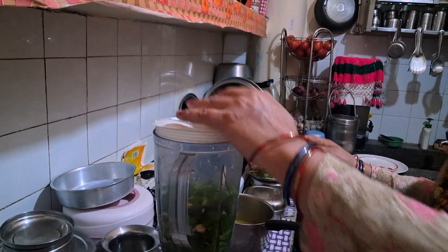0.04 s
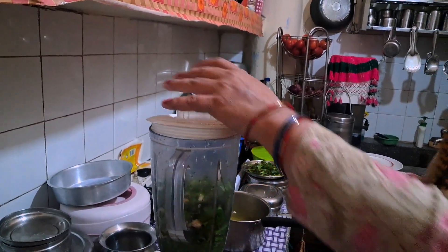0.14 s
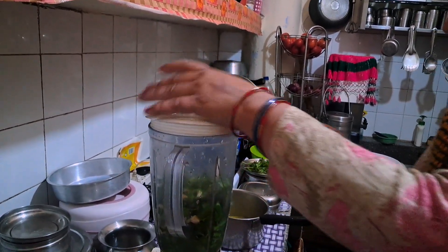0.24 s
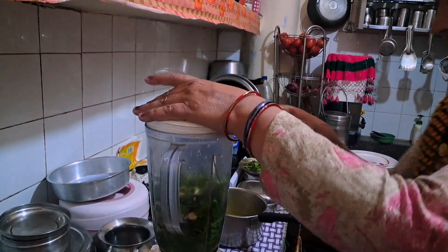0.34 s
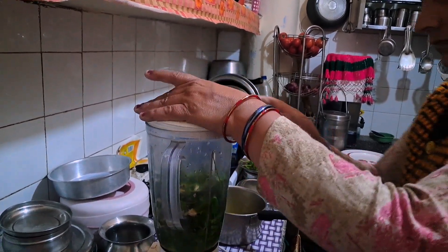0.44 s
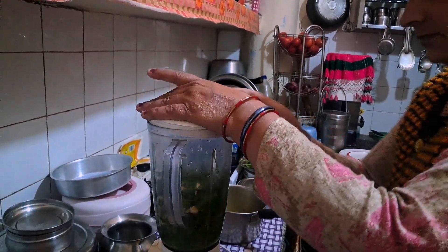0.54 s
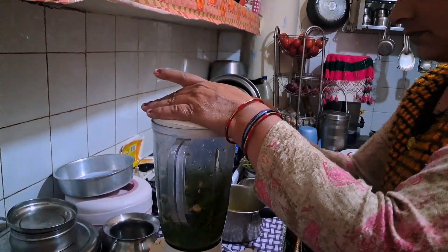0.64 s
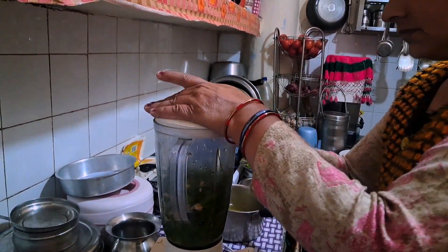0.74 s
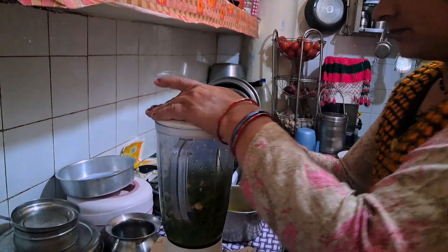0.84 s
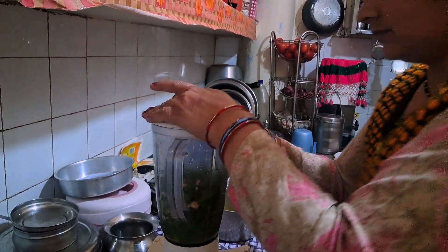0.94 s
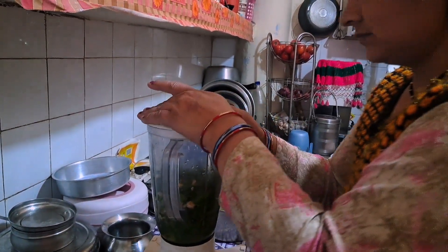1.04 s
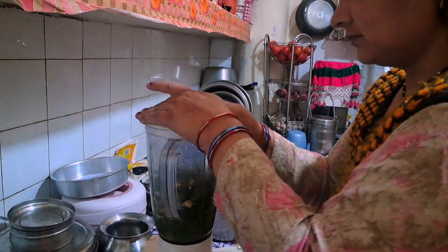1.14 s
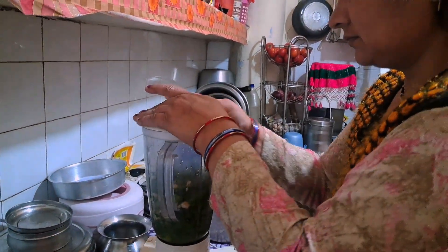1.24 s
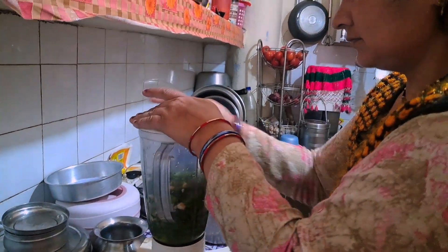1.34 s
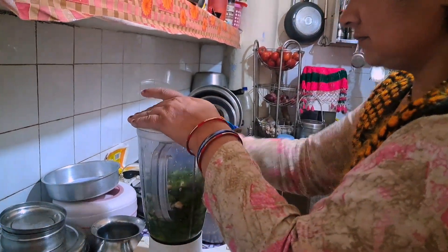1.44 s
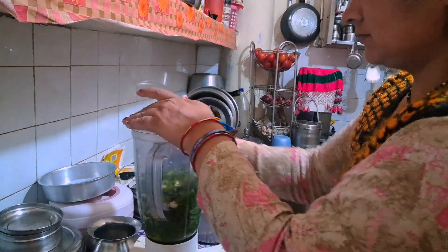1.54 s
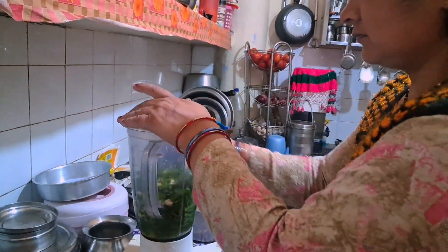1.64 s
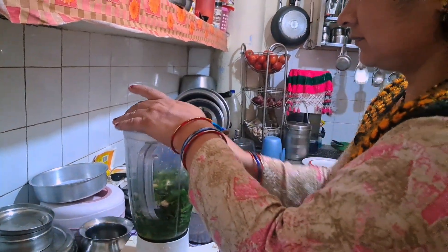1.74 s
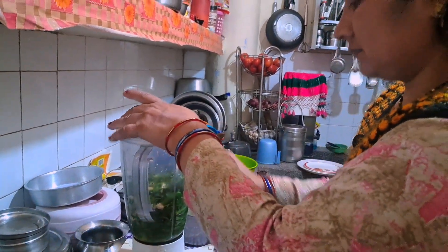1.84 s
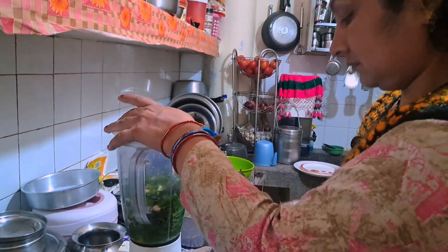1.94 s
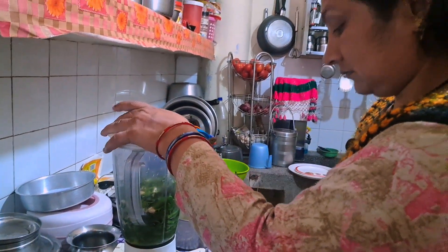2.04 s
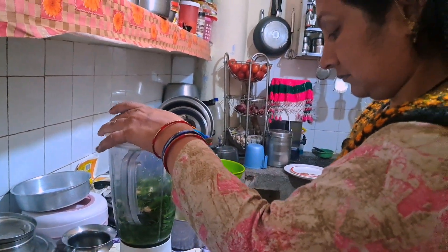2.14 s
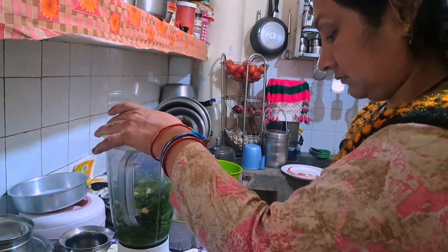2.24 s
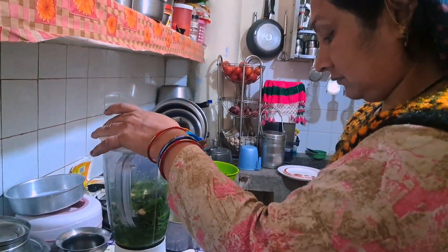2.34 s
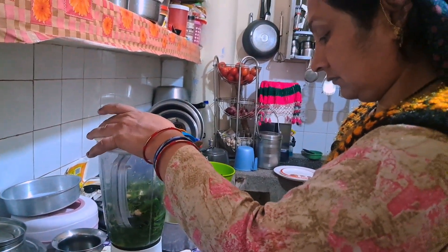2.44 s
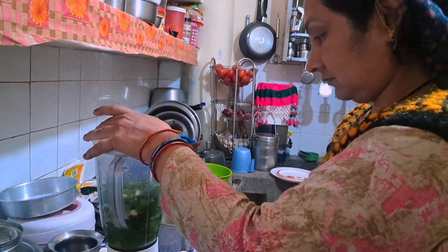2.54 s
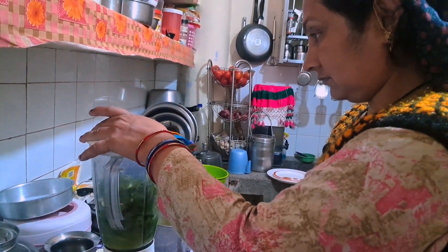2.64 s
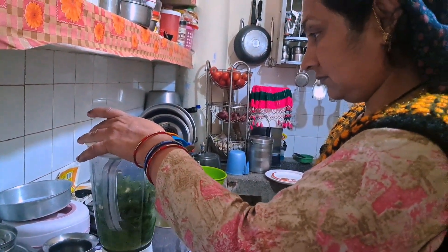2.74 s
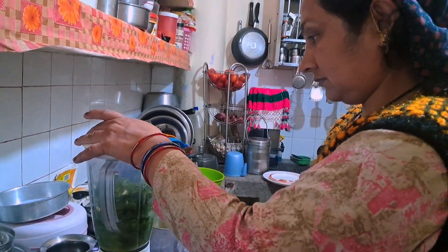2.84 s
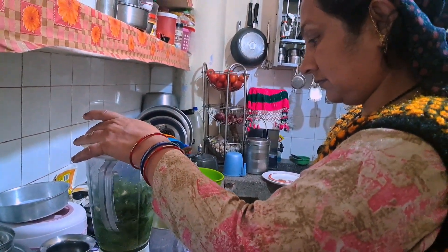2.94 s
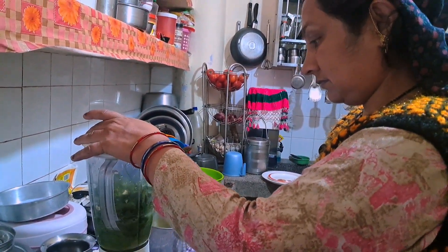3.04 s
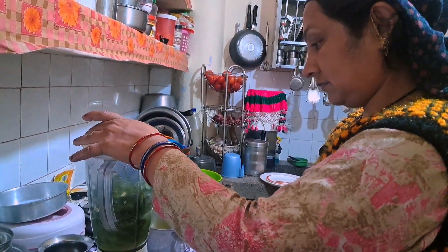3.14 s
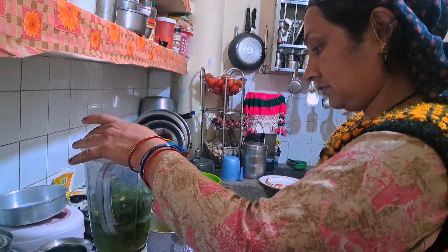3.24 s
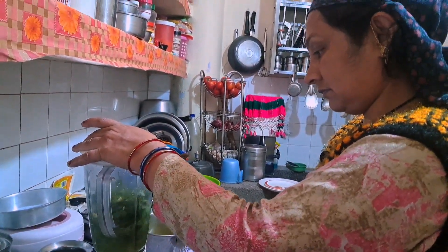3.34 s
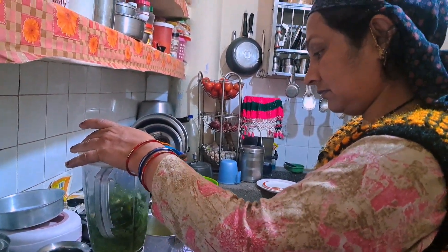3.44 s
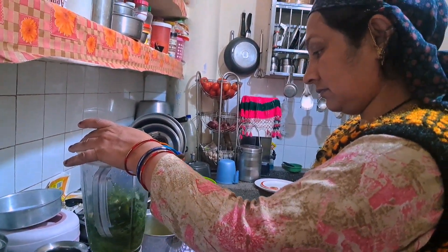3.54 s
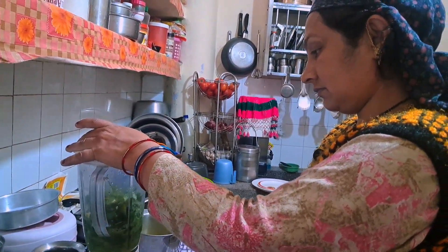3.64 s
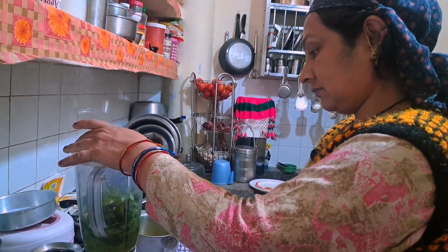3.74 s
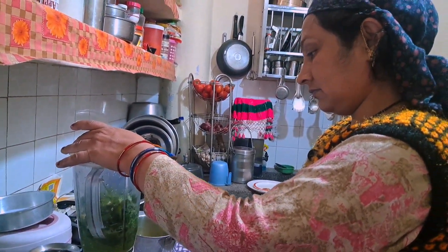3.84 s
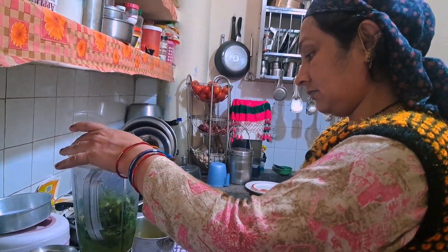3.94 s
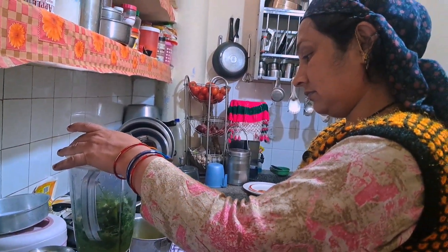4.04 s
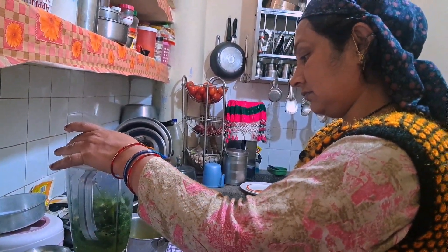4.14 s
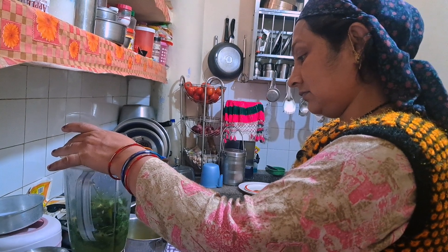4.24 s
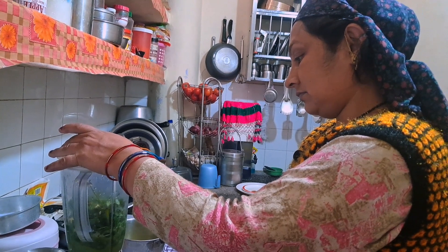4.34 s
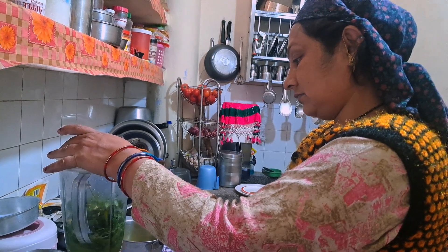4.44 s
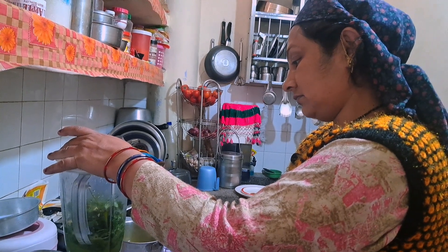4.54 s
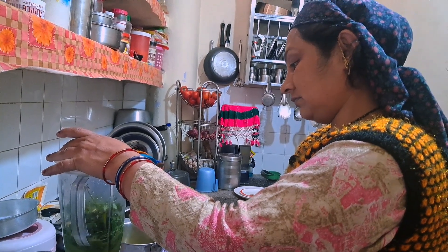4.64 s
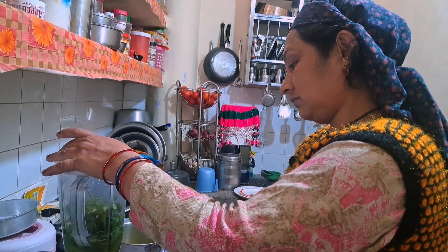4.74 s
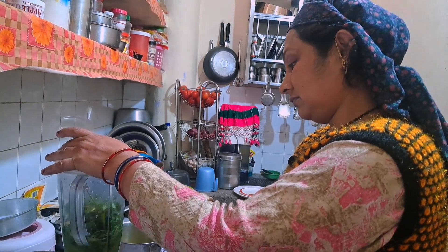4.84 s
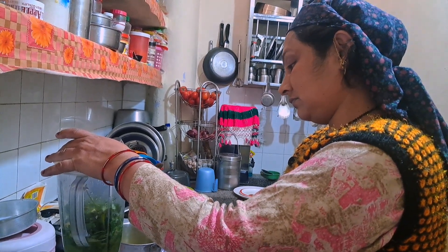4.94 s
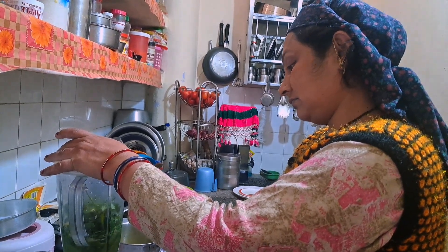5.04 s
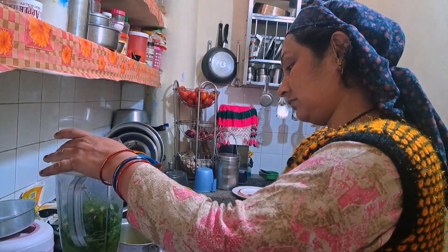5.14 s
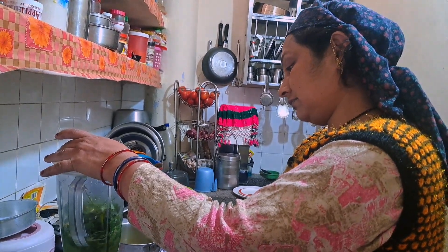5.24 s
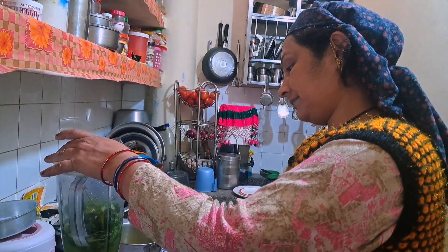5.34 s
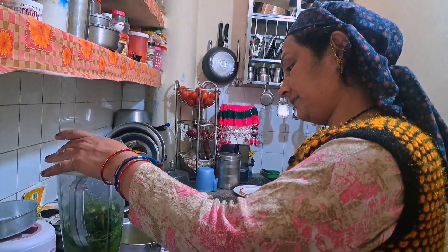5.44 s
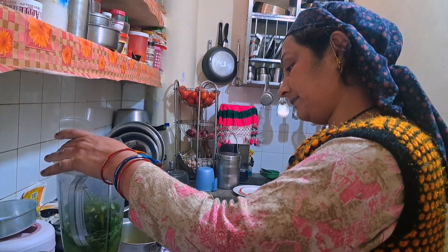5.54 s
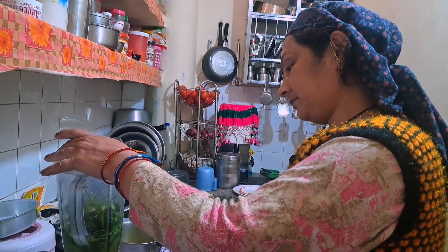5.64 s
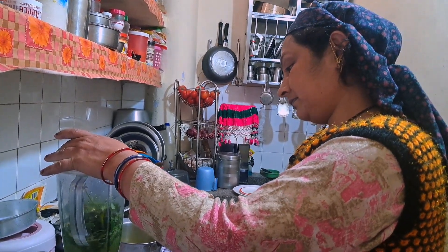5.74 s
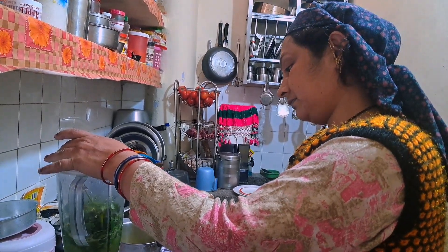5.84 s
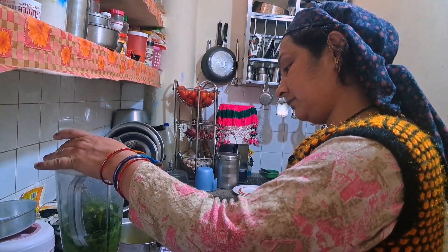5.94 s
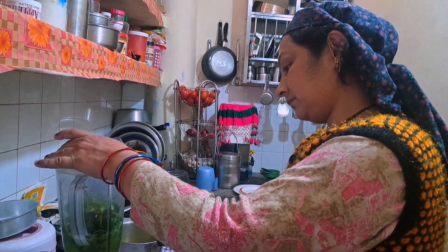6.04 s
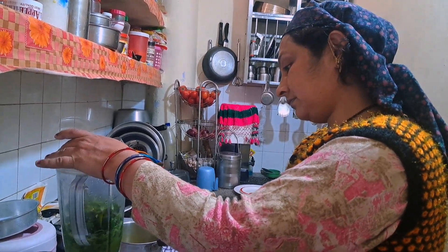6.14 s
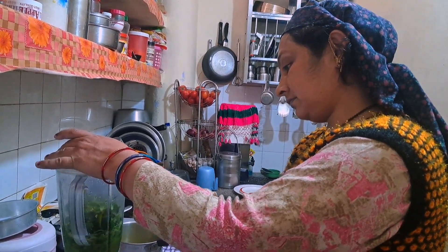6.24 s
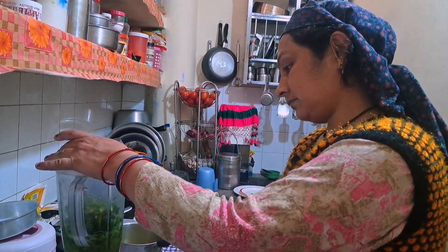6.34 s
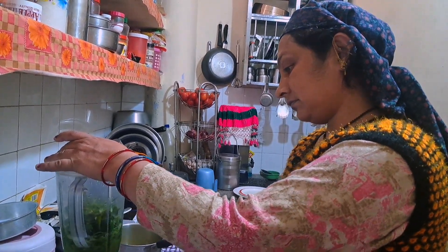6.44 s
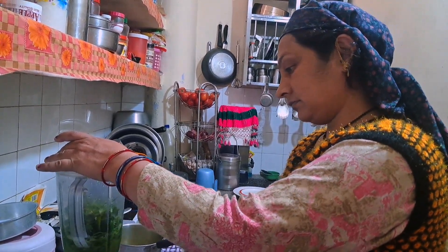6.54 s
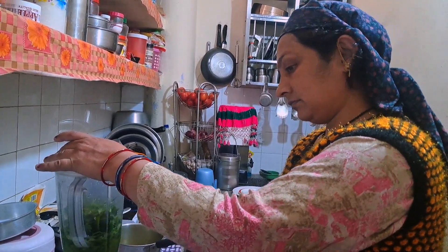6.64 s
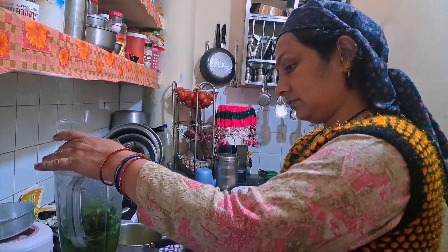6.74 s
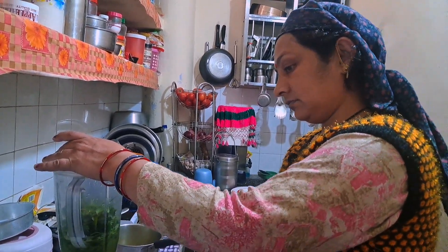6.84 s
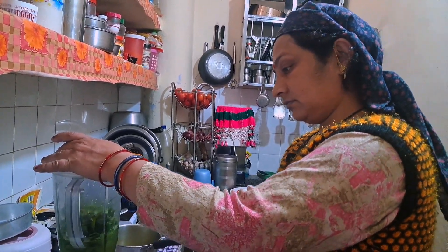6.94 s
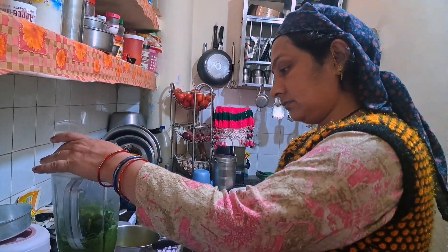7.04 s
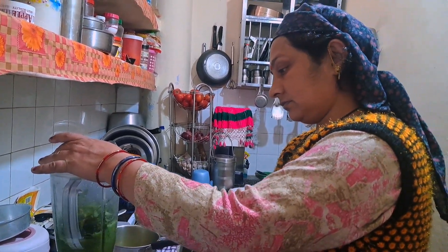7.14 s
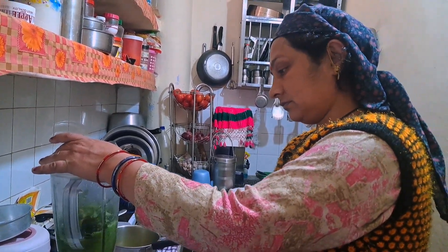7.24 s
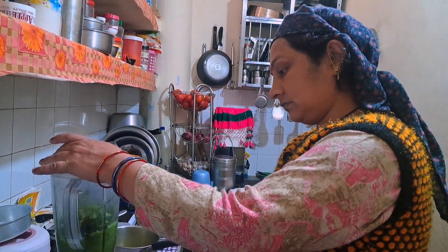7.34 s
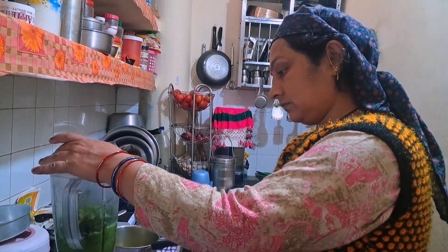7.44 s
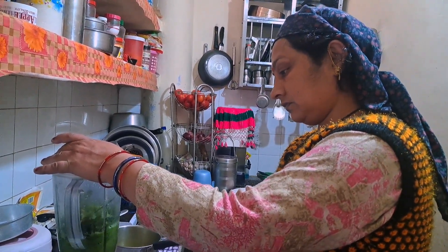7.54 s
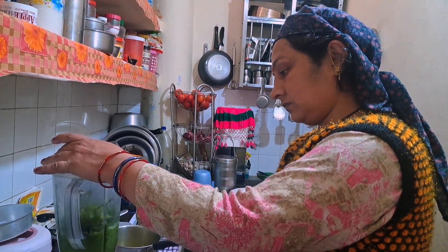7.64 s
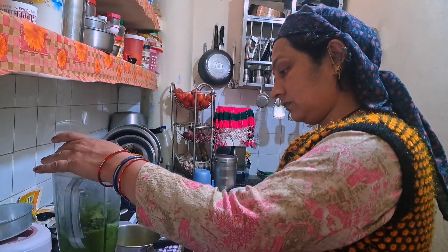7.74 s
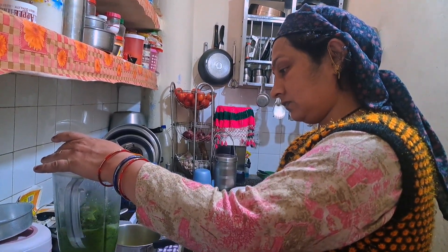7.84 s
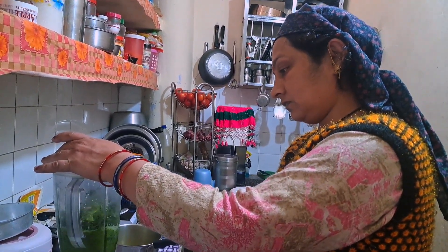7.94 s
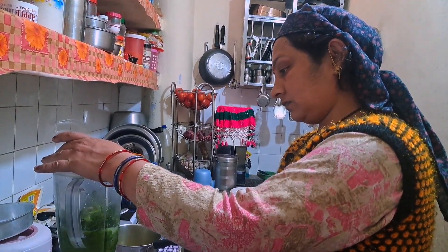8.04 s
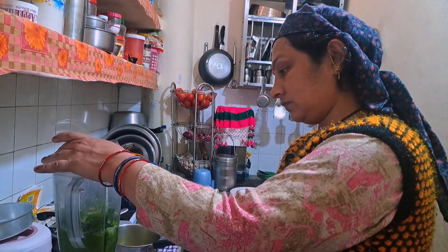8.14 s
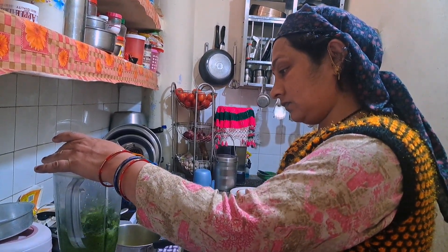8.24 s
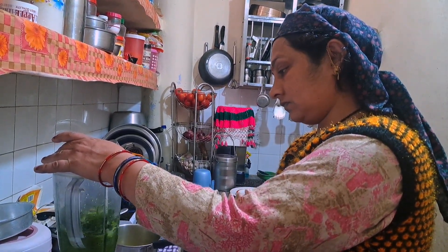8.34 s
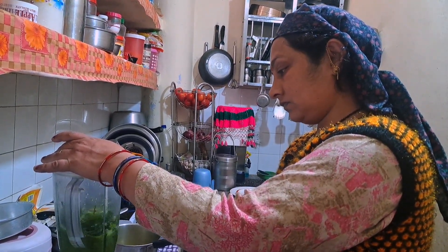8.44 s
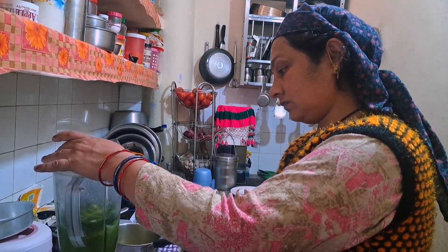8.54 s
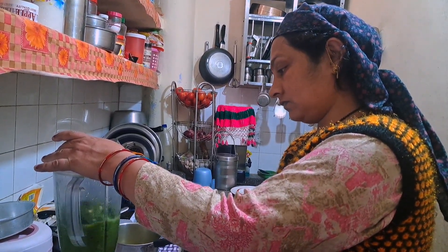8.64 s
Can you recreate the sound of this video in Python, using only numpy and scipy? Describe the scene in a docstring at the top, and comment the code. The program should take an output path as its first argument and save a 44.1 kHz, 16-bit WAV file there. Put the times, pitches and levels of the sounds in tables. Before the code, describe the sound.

Light knocks on a plastic jar and clinking bangles, then an electric kitchen grinder switches on and runs steadily, churning wet greens.

```python
"""A mixer grinder chops wet greens in a small tiled kitchen, heard close by on a phone's microphone.
First a hand presses and seats the lid on the plastic jar, while bangles clink on both wrists.
The level dips briefly, the switch snaps, and the motor runs up to about 250 turns a second,
sagging when the paste loads it. The shaft hums, the blades chop and churn, and fan air rushes
through the housing; the near walls add a short tail."""
import sys
import numpy as np
from scipy import signal
from scipy.fft import rfft, irfft, next_fast_len
from scipy.io import wavfile
from scipy.ndimage import uniform_filter1d

SR = 44100
rng = np.random.default_rng(int(sys.argv[2]) if len(sys.argv) > 2 else 0)


def store_wav(level_fs):
    """Save 16-bit WAV to argv[1]."""
    pcm = np.round(np.clip(np.atleast_2d(level_fs), -1, 1) * 32767)
    wavfile.write(sys.argv[1], SR, pcm.T.astype(np.int16))


N = 383669
TIME = np.arange(N) / SR
EVENT_TIME = TIME[:SR // 2]  # half a second, for short sounds
DIP_START_S, DIP_END_S = 1.903, 2.502
SWITCH_ON_S, CRUISE_HZ = 2.552, 250
BITE_S, HISS_RISE_S, SHRED_S = 0.13, 0.13, 0.25  # time to bite, to open the hiss, to shred the leaves

# room tone of the house: frequency_hz, relative_db
ROOM_SPECTRUM = [(25, -16.5), (65, 3), (120, -14), (250, -8.5), (450, -12.5), (1200, -11), (2400, -13),
                 (3200, -22), (7700, -19.5), (10000, -20.5), (15500, -28)]
# room tone while the level dips: frequency_hz, relative_db
LULL_SPECTRUM = [(30, -11.5), (70, 5), (130, -12), (270, -8), (500, -17), (1200, -20.5), (3000, -28),
                 (8000, -21.5), (15500, -28)]
# bangle contacts: start_s, peak_db, second_wrist_share (0-1), tilt_db_per_octave,
# favoured_hz (by the point of contact), ring_length_factor
BANGLE_CLINKS = [(.3426, -29.5, 0, -2, 8130, 0.93), (.3516, -23.5, 0.3, 5, 9383, 1.9),
                 (.3783, -9.5, 0.2, 6.5, 9480, 0.59), (.394, -22, 0, 4, 9383, 0.64),
                 (.4389, -17.5, 0, 1, 8100, 0.74), (.5033, -42, 0.1, -6, 9383, 0.64),
                 (.7063, -42, .95, -1, 8700, .8), (1.2905, -40, 0.96, 2, 8700, 0.63),
                 (1.4686, -27.5, 0.7, -2, 14015, 0.74), (1.4775, -28.5, 0.96, 7.5, 8060, 1),
                 (1.516, -20.5, 0.5, 5.5, 14015, .7), (1.5212, -19, .9, 3.5, 12010, .6),
                 (1.5275, -7, 0.96, 1.5, 14015, 0.93), (1.533, -13.5, 0.3, 8, 15900, .7),
                 (1.5415, -8.5, 0.7, 5.5, 8800, 0.91), (1.566, -19, 0.7, 5, 12005, .8),
                 (1.6646, -26, 0.2, -0.5, 11750, 1.1), (1.7185, -27.5, 0.3, 2, 11750, .9),
                 (1.727, -23.5, 0.85, 0, 8060, 0.99), (1.735, -22.5, 0.6, 15, 11750, 0.73),
                 (2.1824, -33, .4, 10, 8075, 1.2), (2.3276, -20, 0.8, 7, 12005, 0.63),
                 (2.3535, -19.5, 0.86, 5, 8240, 1)]
# modes of the bangles on each wrist: pitch_hz, relative_db, t60_s
FIRST_WRIST_MODES = [(2724, -18, .14), (3400, -27, .07), (3817, -26, .11), (4240, -29, .07),
                     (4940, -16, .085), (6478, -13, .085), (7285, -16, .15), (8075, -10, .13),
                     (8220, -17, .07), (9390, -4, .085), (10370, -16, .13), (11745, -9, .13),
                     (13180, -15, .06), (15120, -7, .08), (15580, -8, .12)]
SECOND_WRIST_MODES = [(1590, -30, .16), (2705, -20, .21), (3935, -32, .12), (4530, -16.5, .21),
                      (4958, -14, .13), (7160, -22, .13), (7500, -15, .17), (7930, -17, .16),
                      (8062, -7.5, .17), (8665, -14, .13), (8702, -8, .15), (9362, -14, .15),
                      (11040, -22, .13), (11775, -10, .14), (11920, -13, .12), (12005, -10, .13),
                      (13965, -9, .12), (14015, -5, .13), (14955, -16, .14), (15605, -12, .11)]
# scrapes and shoves of hand and lid: centre_s, half_length_s, peak_db, band_hz
LID_SCRAPES = [(0.232, 0.026, -50, 1300), (0.347, 0.018, -34, 298), (0.598, 0.13, -47, 85),
               (0.885, 0.069, -44, 9050), (0.887, 0.058, -39, 110), (0.921, 0.017, -39, 855),
               (1.137, 0.098, -46.5, 94), (1.188, 0.031, -48, 905), (1.206, 0.025, -52.5, 5000),
               (1.399, 0.0077, -42, 1696), (1.415, .04, -39, 830), (1.433, 0.058, -39.5, 7340),
               (1.441, 0.0064, -41.5, 3500), (1.498, 0.056, -46.5, 132), (2.532, 0.046, -48, 355)]
# the lid squeaking in its rim: time_s, pitch_hz, level_db
RIM_SQUEAK = [(.69, 2420, -72), (.715, 2480, -60), (.76, 2750, -65), (.8, 2720, -63), (.84, 2620, -66),
              (.87, 2560, -85)]
# knocks on lid, jar and switch, then jolts of the starting motor:
# start_s, peak_db, dull_above_hz, rattle_t60_s, jar_ring_db, counter_boom_db
KNOCK_BLOWS = [(0.002, -30.5, 600, 0.19, -1, 12), (.345, -33, 397, .1, 7, 19),
               (0.3925, -16, 1300, 0.17, 1, 16), (.399, -22.5, 900, 0.11, 11, 10),
               (0.843, -27.5, 990, 0.14, -4, 6), (.856, -32, 260, 0.55, -9, 10),
               (1.0727, -22.5, 2040, 0.17, -13.5, 12), (1.092, -35, 900, .22, -6, 21),
               (2.5521, -21, 6000, 0.13, -18, -8), (2.5641, -12.5, 1500, 0.14, 2.5, -3),
               (2.5732, -19, 1300, .09, -1, -4), (2.5816, -28, 1100, .09, 7, 0)]
# modes of the jar on its base: pitch_hz, relative_db, t60_s
JAR_MODES = [(80.5, -30, 0.58), (125, -20, 0.67), (177, -26, 0.12), (224, -7.5, 0.22), (291, -8, 0.16),
             (331, -2, 0.19), (410, 2, 0.13), (438, 3.5, 0.045), (590, -13.5, 0.23), (667, -7.5, .13),
             (753, -2.5, 0.097), (943, -9.5, 0.15), (1236, -18, .16), (1610, -29, 0.13), (1720, -24, .12)]
# hard bits flung against the jar: start_s, peak_db
BIT_TICKS = [(2.770, -19), (2.803, -29), (2.935, -28), (8.056, -28)]
# resonances (+) and hollows (-) of jar and housing: centre_hz, width_hz, lift_db
BODY_RESONANCES = [(226.2, 26, 12), (322, 16, 8), (410, 44, 11.5), (670, 110, 10.5), (1122, 84, 5.5),
                   (1432, 93, 7.5), (1520, 115, -4), (1974, 190, 7.5), (2207, 67, 4.5), (2510, 146, 5),
                   (3860, 240, 9), (4210, 240, 6.5), (4610, 200, 8.5), (4736, 155, -6.5), (5430, 320, 8),
                   (5900, 89, 7), (7900, 460, 3.5), (10900, 800, 1)]
# lumps falling into the blades (+) and pockets of air (-): centre_s, half_length_s, churn_db, hiss_db
PASTE_LUMPS = [(2.63, 0.017, -2, -1), (2.675, 0.019, 0, 1), (2.807, 0.067, 1.5, 3.5), (3.03, 0.13, 1, 0.5),
               (3.23, 0.05, 0.5, 1), (3.347, 0.057, 4, 4), (3.446, 0.07, -2, -2.5), (3.666, 0.021, 1, 2.5),
               (3.89, 0.19, -2, -.5), (4.4, .3, -1.2, -0.6), (4.714, 0.025, 3.5, 0), (4.798, .03, -3, -.5),
               (4.88, 0.018, 1, 1.5), (5.934, 0.13, 2, 1.4), (6.242, 0.054, 1.5, -1.5),
               (6.467, 0.1, -3, 0.5), (7.063, 0.032, 3.5, 2), (7.26, 0.016, 3.5, 3), (7.38, 0.051, 2, 0),
               (7.587, 0.042, -2, -0.5), (7.66, 0.043, 2, 3.5), (7.764, 0.03, 1.5, 4.5),
               (7.913, 0.082, -1.5, 0), (8.068, 0.033, 2.5, 3), (8.23, 0.055, -3, -0.5),
               (8.357, 0.015, -3, 4), (8.508, .03, 2.5, 5), (8.585, 0.03, 4.5, 3)]
# broad spectra of the grinding: frequency_hz, relative_db
CHURN_SPECTRUM = [(30, -50), (60, -38), (95, -8.5), (160, -13), (260, -8), (520, -4), (700, -4.5),
                  (950, 3.5), (1300, -9.5), (1800, -26), (3000, -14.5), (7000, -51)]  # churning paste
THUD_SPECTRUM = [(30, -45), (70, -10), (170, -11), (340, -5), (480, -5), (900, -36), (2500, -60),
                 (8000, -88)]  # whole leaves against the jar
AIR_SPECTRUM = [(400, -23), (1200, 0), (2200, 2.5), (2700, -4.5), (3400, -14.5), (4300, -12), (4850, -11.5),
                (5500, -12), (6300, -11), (6900, -18.5), (9000, -21), (15000, -38)]  # fan air
SPRAY_SPECTRUM = [(2000, -2.5), (5000, -15), (7500, 2), (8700, -3), (11000, 2.5), (12300, -2.5), (13300, 2),
                  (14100, -13), (15700, -21)]  # wet spray
CHOP_SPECTRUM = [(300, -32), (900, 2), (2400, 0.5), (3200, -6.5), (6000, -8.5), (8000, -14), (15000, -25)]  # slapping stalks
# brief swells of single tones in the motor's whine: centre_s, half_length_s, pitch_hz, level_db
TONE_SWELLS = [(2.88, 0.3, 394, -37), (3.25, .13, 449.6, -38.5), (4.61, 0.19, 411.4, -37.5),
               (5.27, 0.2, 399.8, -37), (5.576, 0.11, 413.3, -34.5), (6.263, 0.23, 403.6, -37),
               (6.537, 0.17, 2012, -37.5), (6.858, 0.12, 689, -39), (7.35, 0.23, 401.6, -38.5),
               (7.664, 0.085, 502, -39.5), (8.523, .06, 487, -35.5), (8.585, 0.04, 694, -29.5)]
# the shaft spins up, then wads of paste slow it and shift its balance: time_s, turns_per_s, hum_db
SHAFT_RUN = [(2.55, 110, -62), (2.85, 194, -44), (3.05, 217, -32), (3.2, 225, -28), (3.33, 226, -30.5),
             (3.43, 222, -34), (3.55, 237, -34), (3.72, 240.5, -31), (3.95, 245, -38), (4.45, 249, -41.5),
             (4.8, 253.5, -41), (5.05, 249.5, -38.5), (5.4, 258, -48), (5.75, 261, -48), (5.98, 250, -37),
             (6.18, 254, -39), (6.35, 259, -55), (6.6, 268, -51), (6.85, 262, -44), (7.12, 248.5, -36),
             (7.4, 251, -39), (7.6, 256, -45), (7.73, 248.5, -37), (7.88, 245, -36), (8, 253, -43),
             (8.1, 248.5, -38), (8.28, 258, -49), (8.45, 254, -43), (8.6, 236, -29), (8.7, 232, -33)]
# tone of the blades as the paste wraps or frees them: time_s, relative_db
BLADE_TONE = [(2.6, -53), (2.92, -39), (3.1, -44), (3.22, -33), (3.42, -41.5), (3.7, -36.5), (3.9, -47),
              (4.3, -35), (4.7, -43.5), (5.3, -40), (5.7, -44), (5.95, -44), (6.35, -42.5), (6.55, -57),
              (6.9, -52), (7.15, -38.5), (7.65, -42), (7.9, -41), (8.3, -36.5), (8.65, -46)]
# weaker tones of shaft and bearings: shaft_multiple, relative_db, phase_wander_rad
BEARING_TONES = [(1.59, -48.5, 1.7), (2, -50.5, 0.38), (2.59, -47, 2), (4, -49, 0.28), (5, -48, 0.32),
                 (6, -50, 0.54), (8, -48, 0.81), (9, -64, 1), (10, -52.5, 0.85)]


def undb(db):
    """Decibels to gain."""
    return 10 ** (np.asarray(db) / 20)


def unit(x):
    """Scale to rms 1."""
    return x / np.sqrt(np.mean(x ** 2))


def bell(x, centre, half_width):
    """A smooth hump of height 1."""
    return np.exp(-((x - centre) / half_width) ** 2)


def fade(t, t60):
    """Exponential decay that loses 60 dB in t60 seconds."""
    return np.exp(-np.log(1000) * t / t60)


def curves(table):
    """The columns of a timed table, one value a sample."""
    times, *columns = np.transpose(table)
    return [np.interp(TIME, times, column) for column in columns]


def walk(rate):
    """Smooth random drift of spread near 1, changing rate times a second."""
    hold = int(SR / rate)
    steps = np.repeat(rng.standard_normal(N // hold + 1), hold)
    return 1.16 * uniform_filter1d(uniform_filter1d(steps, hold), hold)[:N]


def impacts(rate, spread_db):
    """Random impacts of uneven size, about rate a second; rms 1."""
    hits = rng.random(N) < rate / SR
    return unit(hits * rng.standard_normal(N) * undb(spread_db * rng.standard_normal(N)))


def filtered(x, order, hz, kind="low"):
    """Low-, high- or band-pass with a flat passband."""
    return signal.sosfilt(signal.butter(order, hz, kind, fs=SR, output="sos"), x)


def lift_db(hz, resonances):
    """How much the resonances raise a frequency."""
    return sum(db / (1 + (2 * (hz - centre) / width) ** 2) for centre, width, db in resonances)


def colour(x, spectrum, resonances=()):
    """Give x a broad spectrum with resonances on top; rms 1."""
    grid_hz = np.arange(N + 1) * SR / (2 * N) + 1
    hz, db = np.transpose(spectrum)
    shape_db = np.interp(np.log(grid_hz), np.log(hz), db) + lift_db(grid_hz, resonances)
    size = next_fast_len(N, True)
    gain = np.interp(np.arange(size // 2 + 1) * SR / size, grid_hz, undb(shape_db))
    return unit(irfft(rfft(x, size) * gain, size)[:N])


def ring(modes, weight):
    """Struck modes dying away, each weighted by a function of its frequency."""
    return sum(undb(db) * weight(hz) * rng.choice([-1, 1])
               * np.sin(2 * np.pi * hz * EVENT_TIME) * fade(EVENT_TIME, t60) for hz, db, t60 in modes)


def add(out, start_s, sound, peak_db):
    """Mix a sound in at start_s with the given peak level."""
    i = max(int(start_s * SR), 0)
    out[i:i + len(sound)] += (undb(peak_db) * sound / np.abs(sound).max())[:N - i]


def room_tone(dipped, level_db=-61, lull_db=-85):
    """Low rumble and faint hiss of the house; in the dip little but a dull rumble stays."""
    house = colour(rng.standard_normal(N), ROOM_SPECTRUM) * undb(level_db + walk(13))
    lull = colour(rng.standard_normal(N), LULL_SPECTRUM) * undb(lull_db)
    return np.where(dipped, lull, house)


def kitchen(x, wet_db, t60, dull_hz=5000, thin_hz=40):
    """Close tiled walls return a short, dense tail, 4 ms behind the direct sound."""
    tail = rng.standard_normal(len(EVENT_TIME)) * fade(EVENT_TIME, t60) * (EVENT_TIME > 0.004)
    tail = filtered(filtered(tail, 1, dull_hz), 2, thin_hz, "high")
    return x + undb(wet_db) * signal.fftconvolve(x, tail / np.linalg.norm(tail))[:N]


def bangles(tick_db=-9, neighbour_db=-3.5, detune=0.02, damping=0.83, favour_db=7):
    """Each contact rings one bangle freely and a slightly detuned neighbour that the skin damps."""
    out = np.zeros(N)
    for start_s, peak_db, share, tilt_db, favoured_hz, length in BANGLE_CLINKS:
        def weight(hz):
            return undb(tilt_db * np.log2(hz / 9000) + favour_db * bell(hz, favoured_hz, 200))
        tone = 0
        for modes, part in ((FIRST_WRIST_MODES, 1 - share), (SECOND_WRIST_MODES, share)):
            free = [(hz, db, t60 * length) for hz, db, t60 in modes]
            neighbour = [(hz * (1 + detune * rng.standard_normal()), db + neighbour_db, t60 * damping)
                         for hz, db, t60 in free]
            tone += part * (ring(free, weight) + ring(neighbour, weight))
        tick = filtered(rng.standard_normal(len(EVENT_TIME)), 4, 7000, "high")
        add(out, start_s, tone + undb(tick_db) * tick * fade(EVENT_TIME, t60=0.028), peak_db)
    return out


def lid_scrapes(grain_db=3):
    """Palm and lid rub in short, grainy strokes."""
    out = np.zeros(N)
    grain = undb(grain_db * walk(250))[:len(EVENT_TIME)]
    for centre_s, half_s, peak_db, hz in LID_SCRAPES:
        band_hz = [hz / 2, hz * 1.6]
        friction = rng.standard_normal(len(EVENT_TIME)) * grain
        friction = filtered(filtered(friction, 1, band_hz, "band"), 1, band_hz, "band")
        add(out, centre_s - 2 * half_s, friction * bell(EVENT_TIME, 2 * half_s, half_s), peak_db)
    return out


def rim_squeak(waver_hz=45, flutter_db=2):
    """The lid slides in its rim with one faint, unsteady squeak."""
    hz, db = curves(RIM_SQUEAK)
    sliding = (TIME > RIM_SQUEAK[0][0]) & (TIME < RIM_SQUEAK[-1][0])
    level = sliding * undb(db + flutter_db * walk(63))
    return level * np.sin(2 * np.pi * np.cumsum(hz + waver_hz * walk(400)) / SR)


def knocks(rattle_db=12, crack_db=17, scatter_db=1.5):
    """A blow cracks, rattles loose parts, booms in the counter, rings the jar; soft contact dulls it."""
    out, t = np.zeros(N), EVENT_TIME
    for start_s, peak_db, dull_hz, rattle_t60, ring_db, boom_db in KNOCK_BLOWS:
        envelope = undb(rattle_db) * fade(t, rattle_t60) + undb(crack_db) * fade(t, t60=0.0064)
        clatter = filtered(rng.standard_normal(len(t)) * envelope, 1, [90, 2000], "band")
        boom = filtered(rng.standard_normal(len(t)), 2, [90, 300], "band") * fade(t, t60=0.29)
        jar = ring(JAR_MODES, lambda hz: undb(ring_db + scatter_db * rng.standard_normal()))
        add(out, start_s, filtered(clatter + undb(boom_db) * boom + jar, 1, dull_hz), peak_db)
    return out


def hard_bits():
    """Hard bits tick on the jar wall."""
    out, t = np.zeros(N), TIME[:SR // 8]
    for start_s, peak_db in BIT_TICKS:
        tick = rng.standard_normal(len(t)) * fade(t, t60=0.037)
        add(out, start_s, filtered(tick, 1, [3500, 11000], "band"), peak_db)
    return out


def running_s():
    """Seconds since the motor was switched on, 0 before."""
    return np.maximum(TIME - SWITCH_ON_S, 0)


def biting_db(rise_s, idle_db=-8):
    """The blades take a moment to bite: a climb from the idle level to 0 dB."""
    return idle_db * np.clip(1 - (running_s() / rise_s) ** 2, 0, 1)


def whole_leaves():
    """Share of leaves still whole, falling from 1 as the blades shred them."""
    return np.exp(-running_s() / SHRED_S)


def paste_load(whole_leaves_db=7, leaf_hiss_share=0.26, thinning_db_per_s=0.2):
    """Swell of churning and of hiss in dB: the blades bite, shred, then meet lumps and pockets."""
    running = running_s()
    leaves_db = whole_leaves_db * whole_leaves()
    thinning_db = thinning_db_per_s * (running - running[-1] / 2)  # thinner paste hisses more
    churn_db = biting_db(BITE_S) + leaves_db
    hiss_db = biting_db(HISS_RISE_S) + leaf_hiss_share * leaves_db + thinning_db
    for centre_s, half_s, lump_churn_db, lump_hiss_db in PASTE_LUMPS:
        lump = bell(TIME, centre_s, half_s)
        churn_db += lump_churn_db * lump
        hiss_db += lump_hiss_db * lump
    return churn_db, hiss_db


def slosh(x, depth_db=1, rate=6, count=14):
    """Paste sliding over the jar wall lets each band swell and sink on its own."""
    size = next_fast_len(N, True)
    spectrum = rfft(x, size)
    place = np.sqrt(np.linspace(0, 1, len(spectrum))) * count  # bands widen towards the treble
    bands = (irfft(spectrum * np.clip(1 - abs(place - k), 0, 1), size)[:N] for k in range(count))
    return sum(band * undb(depth_db * walk(rate)) for band in bands)


def tone_swells(waver_hz=11, flutter_db=2):
    """Single tones swell briefly in the motor's whine: shaft overtones and jar resonances."""
    out = np.zeros(N)
    for centre_s, half_s, hz, db in TONE_SWELLS:
        phase = 2 * np.pi * np.cumsum(hz + waver_hz * walk(50)) / SR
        level = undb(db + flutter_db * walk(40)) * bell(TIME, centre_s, half_s)
        out += np.sqrt(2) * level * np.sin(phase)
    return out


def chopping(load_db, base_db=-42, load_power=1.5):
    """Stalks hit the blades in short, uneven slaps that stand out when a lump falls in."""
    slap = fade(TIME[:SR // 20], t60=0.03)
    energy = np.abs(signal.fftconvolve(impacts(220, spread_db=0) ** 2, slap ** 2)[:N])
    slaps = colour(rng.standard_normal(N) * np.sqrt(energy), CHOP_SPECTRUM, BODY_RESONANCES)
    return slaps * undb(base_db + load_power * load_db)


def shaft_tones(turns_per_s, turns, hum_db, load_db, flutter_db=1.6, swell_db=1.5, body_share=0.38):
    """Unbalance hums once a turn, the blades three times; the body colours, the paste shakes them."""
    def tone(multiple, db, wander_rad):
        level = undb(db + flutter_db * walk(25) + swell_db * walk(6))
        return np.sqrt(2) * level * np.sin(2 * np.pi * multiple * turns + wander_rad * walk(30))

    def through_body(multiple, db, wander_rad):
        body_db = body_share * lift_db(multiple * turns_per_s, BODY_RESONANCES)
        return tone(multiple, db + body_db, wander_rad) * (turns_per_s / CRUISE_HZ) ** 0.96

    hum = tone(1, hum_db, wander_rad=0.21)
    blades = through_body(3, curves(BLADE_TONE)[0] + 2 * walk(9), wander_rad=0.24)
    bearings = undb(load_db / 2 - 3) * sum(through_body(*row) for row in BEARING_TONES)
    mains = undb(-58) * np.sin(2 * np.pi * 100 * TIME)
    return hum + blades + bearings + mains


def motor_kick(start_s=2.565, peak_db=-21, rise_s=0.03):
    """The starting motor kicks the housing, which rings at its lowest resonance."""
    out, t = np.zeros(N), EVENT_TIME
    envelope = fade(t, t60=0.31) * (1 - fade(t, rise_s))
    add(out, start_s, np.sin(2 * np.pi * BODY_RESONANCES[0][0] * t) * envelope, peak_db)
    return out


def grinder(throb=0.12, attack_s=0.032):
    """Chopped paste, fan air and spray excite jar and housing, pulsing with each turn of the shaft."""
    turns_per_s, hum_db = curves(SHAFT_RUN)
    churn_db, hiss_db = paste_load()
    turns = np.cumsum(turns_per_s) / SR
    pulse = 1 + throb * (np.cos(2 * np.pi * turns) + 1.34 * np.cos(4 * np.pi * turns))
    surge = undb(0.1 * walk(45))  # small shreds fall into the blades
    cuts = impacts(6000, spread_db=1.5) * pulse * surge
    churn = colour(cuts, CHURN_SPECTRUM, BODY_RESONANCES) * undb(churn_db - 32)
    leaf_hits = impacts(500, spread_db=0.5)
    thuds = colour(leaf_hits, THUD_SPECTRUM) * undb(biting_db(BITE_S) - 30) * whole_leaves()
    turbulence = rng.standard_normal(N) * pulse * undb(1.2 * walk(60))
    air = colour(turbulence, AIR_SPECTRUM, BODY_RESONANCES) * undb(hiss_db - 33.5)
    droplets = rng.standard_normal(N) * pulse * surge
    spray = colour(droplets, SPRAY_SPECTRUM, BODY_RESONANCES) * undb(hiss_db - 48)
    rush = churn + thuds + slosh(air + spray) + chopping(hiss_db)
    tones = shaft_tones(turns_per_s, turns, hum_db, churn_db) + tone_swells()
    power = np.minimum(running_s() / attack_s, 1)
    return power * (rush + tones) + motor_kick()


def scene(dip_db=-24):
    """At the counter: handling, then grinding; the level dips briefly before the switch."""
    dipped = (TIME > DIP_START_S) & (TIME < DIP_END_S)
    clinks = kitchen(bangles(), wet_db=-7.5, t60=0.16, dull_hz=8000)
    contacts = knocks() + hard_bits() + lid_scrapes() + rim_squeak()
    contacts = kitchen(contacts, wet_db=-16.5, t60=0.37, dull_hz=1990)
    house = room_tone(dipped)
    grinding = kitchen(grinder(), wet_db=-14.5, t60=0.29, thin_hz=690)
    return (house + undb(dip_db * dipped) * (clinks + contacts) + grinding)[None]


def record(dry, bass_hz=50, top_hz=15750):
    """The phone's microphone, in mono: it thins the deep bass and cuts the top."""
    thin = filtered(dry, 3, bass_hz, "high")
    return signal.sosfilt(signal.ellip(10, 0.2, 80, top_hz, fs=SR, output="sos"), thin)


dry = scene()
out = record(dry)
store_wav(out)
```